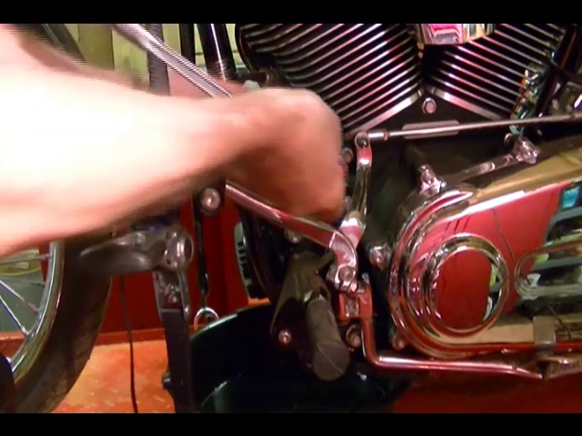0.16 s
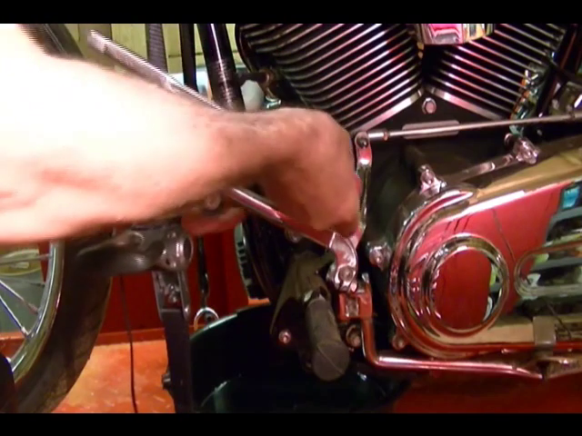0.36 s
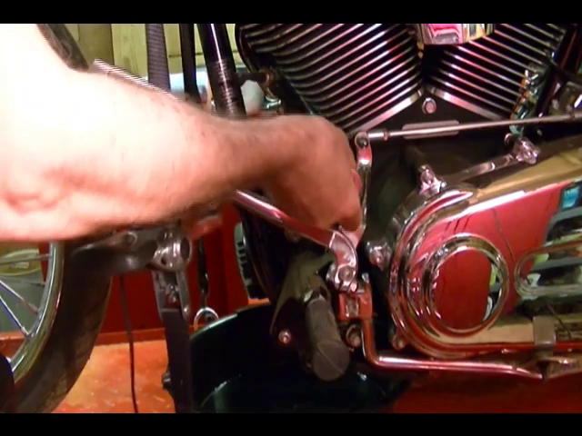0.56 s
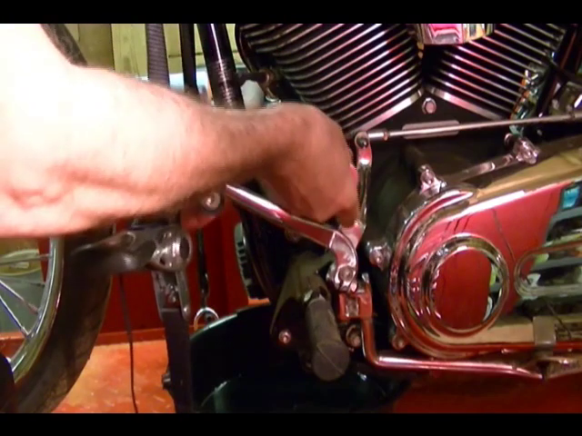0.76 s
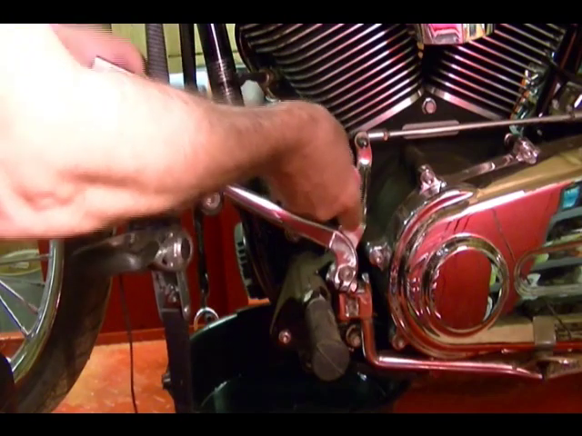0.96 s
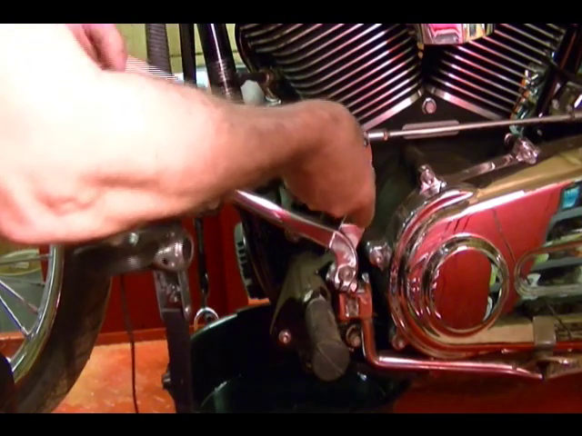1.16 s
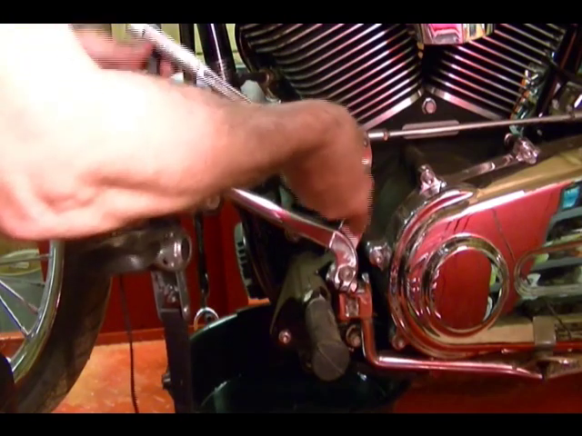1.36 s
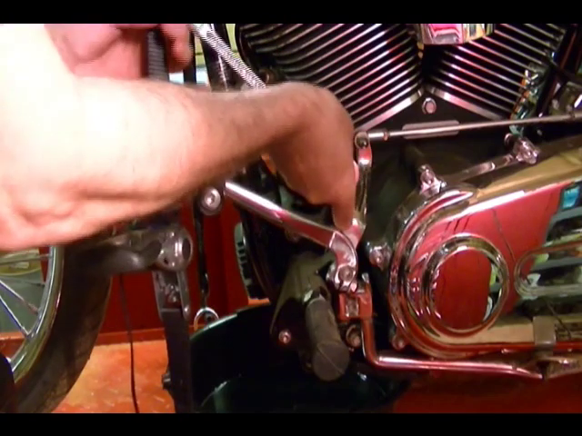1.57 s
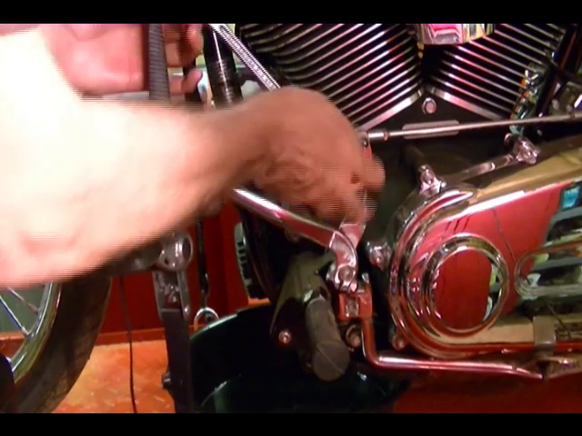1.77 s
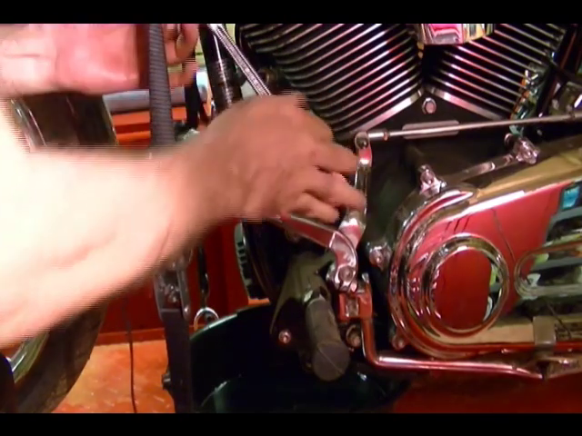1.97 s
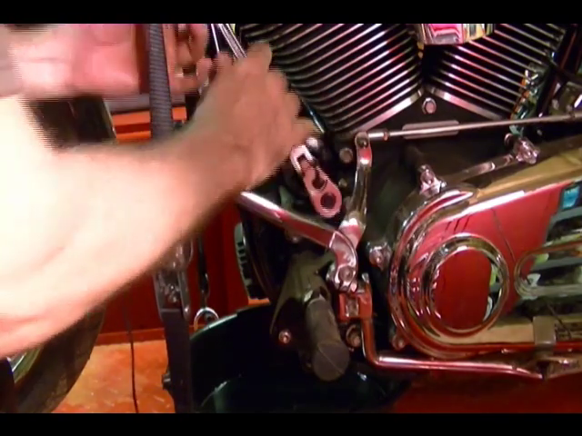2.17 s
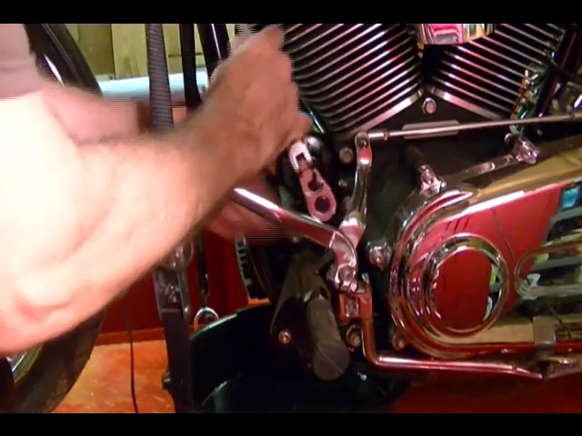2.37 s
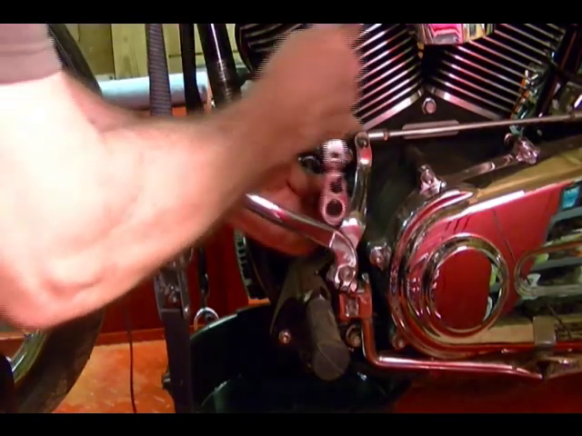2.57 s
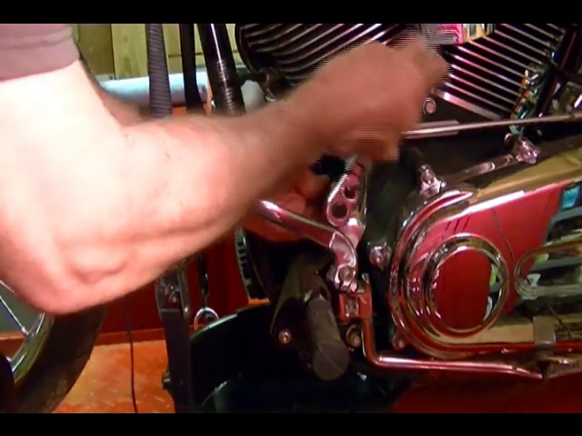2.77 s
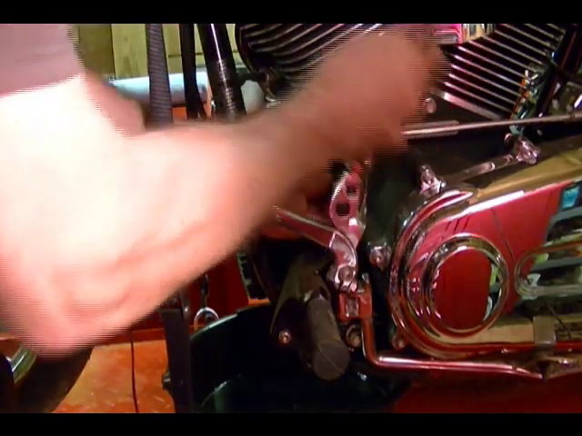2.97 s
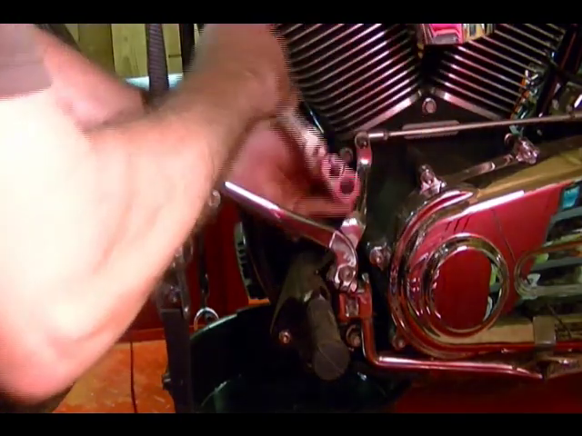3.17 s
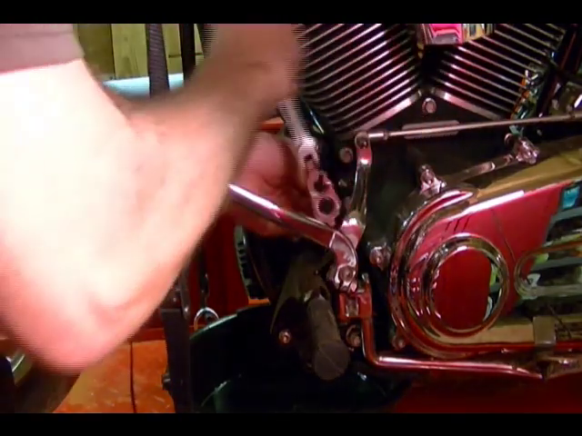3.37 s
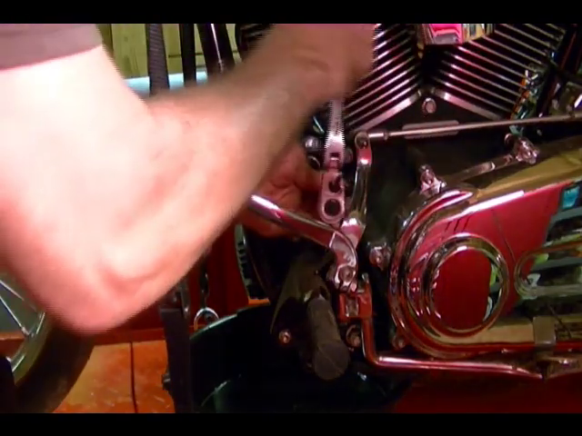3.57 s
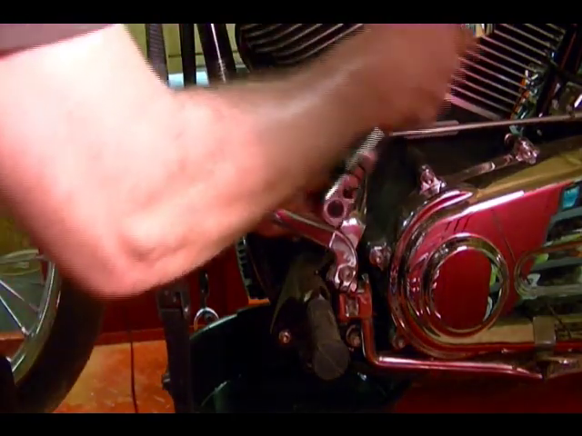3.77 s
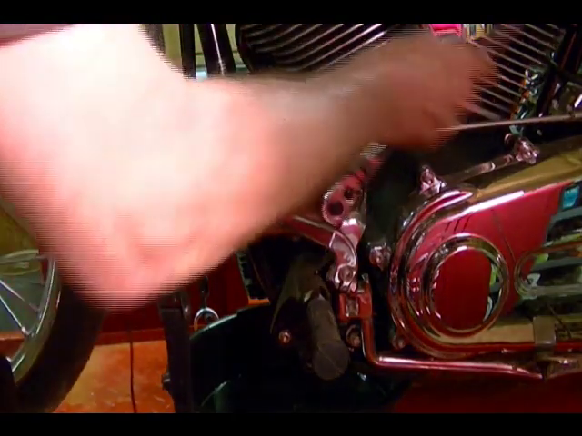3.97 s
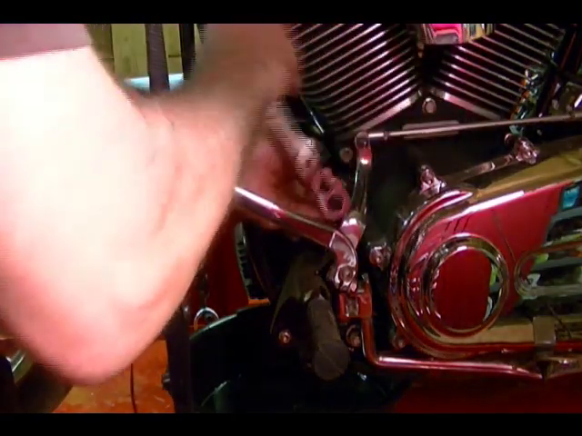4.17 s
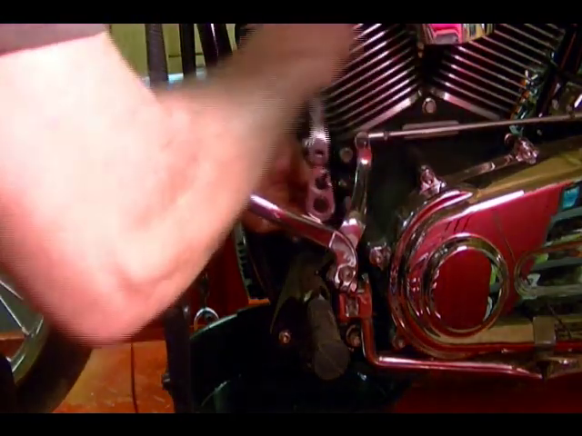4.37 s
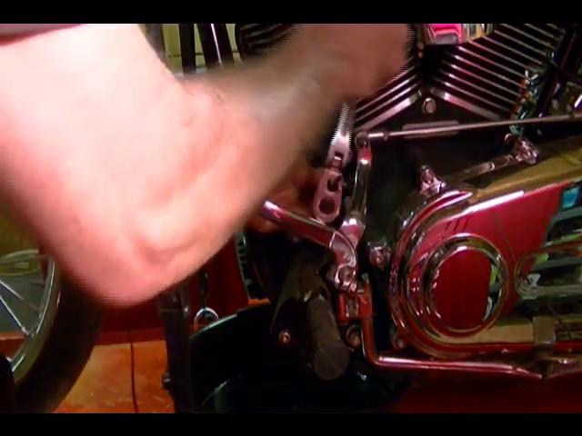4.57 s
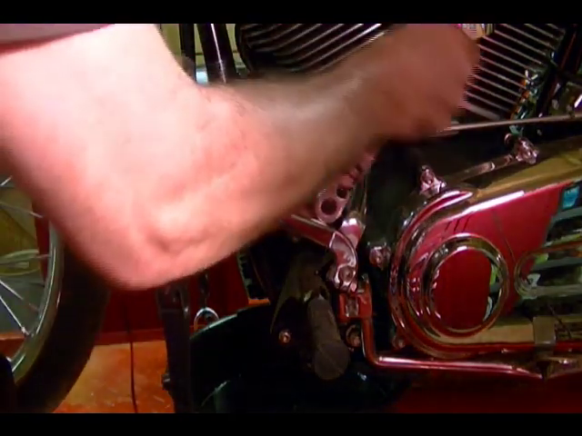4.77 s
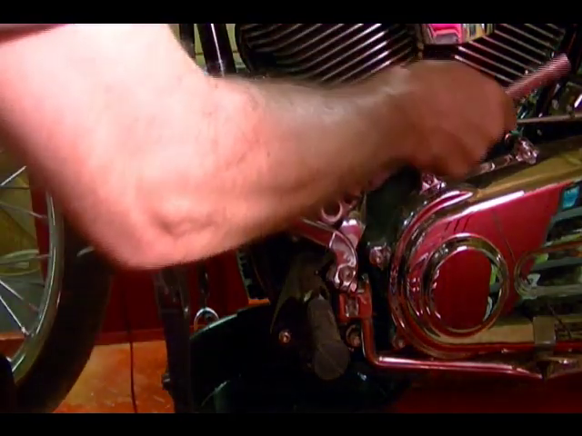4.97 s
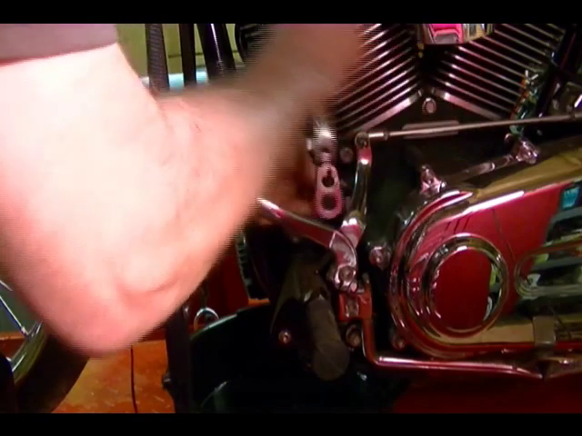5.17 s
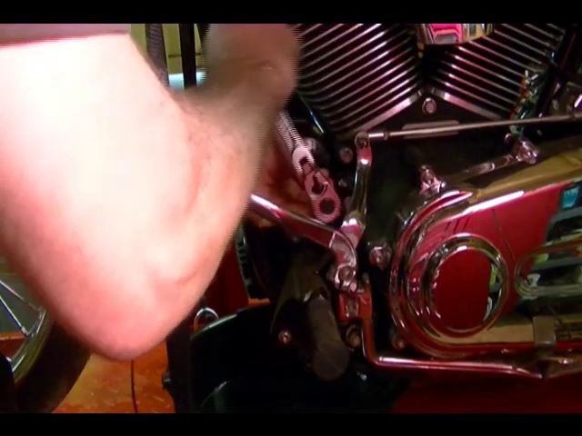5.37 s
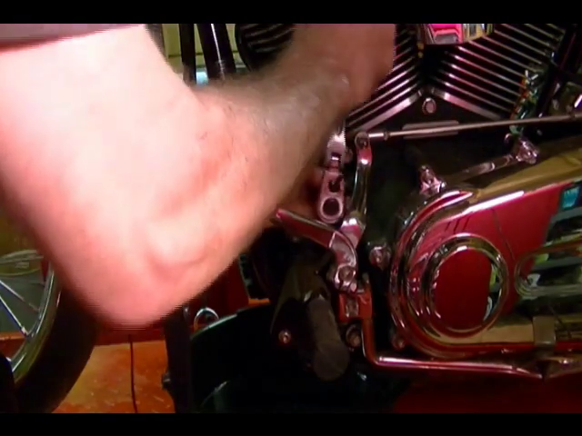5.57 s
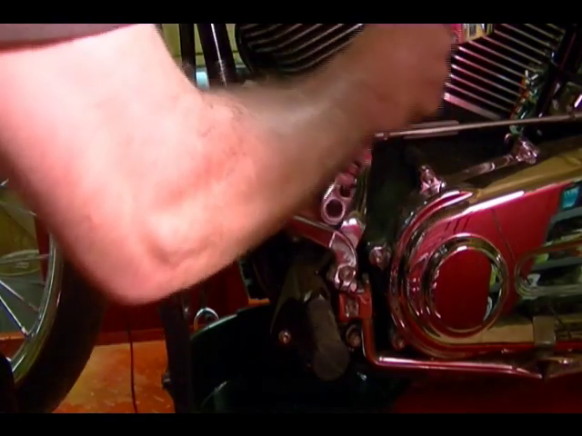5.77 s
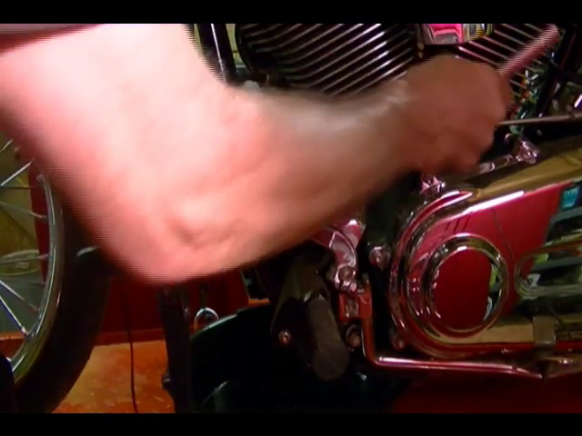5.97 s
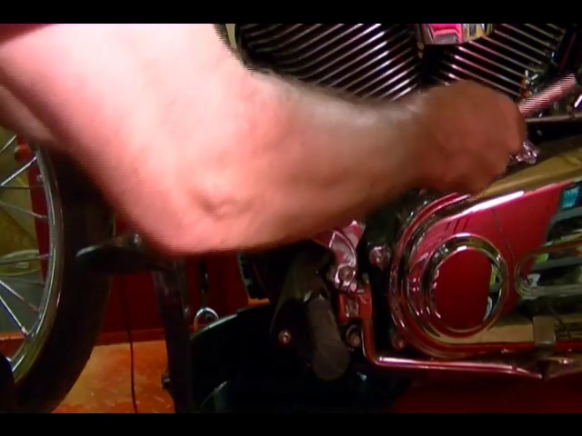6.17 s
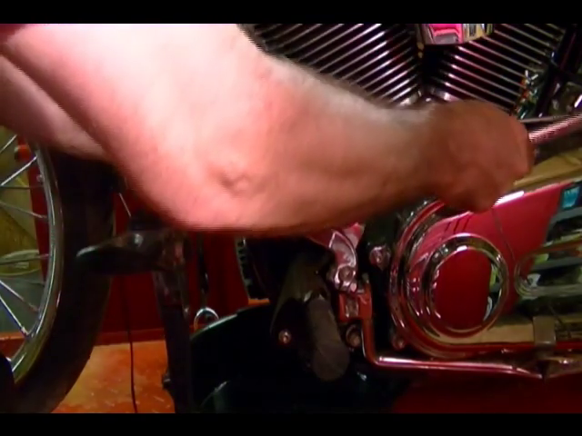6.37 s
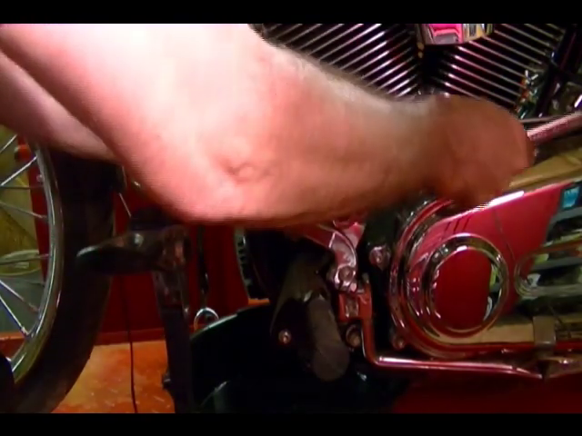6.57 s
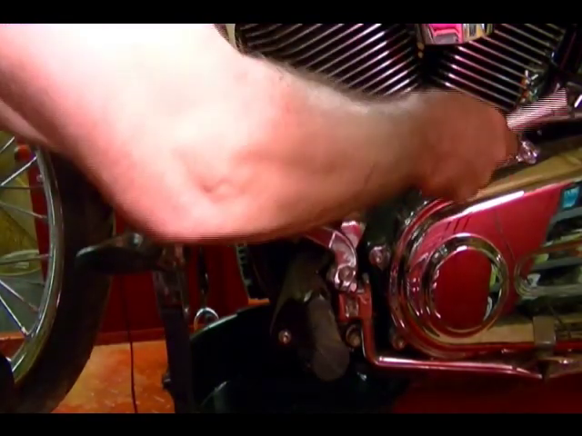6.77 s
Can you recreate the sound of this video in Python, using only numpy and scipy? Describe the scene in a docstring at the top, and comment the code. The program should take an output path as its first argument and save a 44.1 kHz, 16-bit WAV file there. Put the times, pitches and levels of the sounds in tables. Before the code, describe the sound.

Close microphone in a small garage with faint hiss and motor hum. A socket tool clanks hard on a motorcycle engine, its steel extension ringing brightly, then jangles and knocks dully into place. After soft hand rustling and a few light taps, a ratchet swings three times about a second apart: a quick run of four or five ticks, loose socket knocks, and a tight metallic snap. It ends nearly quiet.

```python
"""Steel clanks and rings over a faint hum and hiss, in a small garage: a socket ratchet is seated on a
filter of a motorcycle engine, then swung three times. On each back swing the pawl ticks over the teeth,
the loose socket knocks and the drive snaps tight. Blows are short bursts of coloured noise with decaying
sines, slides and pushes are shaped noise; the room adds scatter and a tail, and the recorder's gain control
ducks after the loudest blows."""
import sys
import numpy as np
from scipy import signal
from scipy.fft import rfft, irfft
from scipy.io import wavfile
from scipy.ndimage import uniform_filter1d, minimum_filter1d

SR = 44100
rng = np.random.default_rng(int(sys.argv[2]) if len(sys.argv) > 2 else 0)


def put_to_file(sound):
    """Save the sound as 16-bit audio at rate SR, in the file named by the first command-line argument."""
    columns = np.atleast_2d(sound).T  # one column per channel
    safe = np.clip(columns, -1, 1)
    whole_steps = np.round(safe * 32767)
    wavfile.write(sys.argv[1], SR, whole_steps.astype(np.int16))


N = 300188
T = np.arange(SR // 2) / SR  # time since a blow [s]

# All event levels are relative: each layer may add its own trim.
# tool striking the engine: (time [s], level [dB], main resonance [Hz], hard crack [dB],
# ping of the contact [Hz], ping level [dB], send to the room [dB])
ENGINE_CLANKS = [(0.083, -40, 1320, -27, 5800, 3, -12.5), (0.3906, -18, 1870, -2, 5940, -27, -9.5),
                 (0.41, -26.5, 1830, -4, 8600, 0, -18), (0.4171, -26.5, 1650, -5, 5900, -4, -8.5),
                 (0.4704, -9, 1970, -5, 4880, -41, -18), (0.8026, -19, 1192, -12.5, 4560, -14, -11),
                 (1.4, -23.5, 1170, 1, 9550, 1, -11), (2.2829, -19, 2500, -2, 4720, 8, -11),
                 (3.4731, -37.5, 1840, -16, 4660, 16, -11.5), (5.049, -36.5, 1530, -21, 5000, 7, -14),
                 (5.5037, -26.5, 1770, -16, 4500, 14, -7.5)]
CLANK_REF_DB = -20.5  # clank level at which the body and thud have their stated levels
# spectrum of a pawl tick or light tap: (frequency [Hz], level [dB])
TICK_SPECTRUM = [(50, -41), (300, -12), (900, -3.5), (1800, 7.5), (2800, 2), (3800, 2), (5000, 11.5),
                 (6300, 5.5), (7800, 6.5), (12500, 1.5), (16000, -16)]
# spectrum of hard steel cracking or rasping on steel: (frequency [Hz], level [dB])
CRACK_SPECTRUM = [(100, -50), (1500, -34.5), (3000, 4.5), (3900, -3), (4800, 15), (6500, 12.5),
                  (10000, 4.5), (13000, 3.5), (16000, -52)]


def amp(db):
    """Decibels to gain."""
    return 10 ** (np.asarray(db) / 20)


def evened(x):
    """Scales to rms 1."""
    return x / np.sqrt(np.mean(x ** 2) + 1e-20)


def unit_blow(x):
    """Scales to the energy of one millisecond at full level."""
    return x / np.sqrt(np.sum(x ** 2) * 1000 / SR + 1e-20)


def read(points, hz):
    """Joins (frequency [Hz], value) points on a log-frequency axis."""
    f, value = np.transpose(points)
    return np.interp(np.log(hz + 1), np.log(f), value)


def add(mix, s, sound):
    """Mixes a sound in at time s."""
    part = mix[max(round(s * SR), 0):][:len(sound)]
    part += sound[:len(part)]


def coloured(x, colour, size=2048):
    """Causal (minimum-phase) filter with the given spectrum, so attacks stay sharp."""
    hz = abs(np.fft.fftfreq(size, 1 / SR))
    log_gain = np.log(amp(read(colour, hz)))
    taps = np.fft.ifft(np.exp(np.conj(signal.hilbert(log_gain)))).real
    return signal.fftconvolve(x, taps)[:len(x)]


def chatter(colour, fade_s):
    """Steel chattering on steel: coloured noise that dies away exponentially."""
    burst = rng.standard_normal(len(T)) * np.exp(-T / fade_s)
    return unit_blow(coloured(burst, colour))


def ring(modes):
    """Decaying sines of a struck part."""
    return sum(amp(db - 60 * T / t60) * np.sin(2 * np.pi * hz * T) for hz, db, t60 in modes)


def rattled(modes, push):
    """Modes driven by a rough contact; each keeps its own share of the energy."""
    rings = [ring([mode]) for mode in modes]
    return sum(np.linalg.norm(r) * unit_blow(signal.fftconvolve(push, r)[:len(T)]) for r in rings)


def swell(length):
    """Rises to 1 at half the length [s], then fades."""
    u = 2 * T / length
    return u * np.exp(1 - u)


def pawl(level_db=1, lone_buzz_db=-14, buzz_slope=1.1, jolt_db=-13.5, jolt_delay_s=0.00196):
    """The pawl drops over teeth at evenly changing gaps; harder drops buzz more, each jolts the loose socket."""
    # back swings of the handle: (time [s], teeth passed [count], first gap [s], change of gap per tooth [s],
    # level [dB], growth per tooth [dB], buzz of the handle [dB])
    back_swings = [(3.047, 5, 0.0233, 0.0023, -33, 3, -7), (4.0894, 4, 0.021, -0.0002, -23, -1, -14),
                   (5.1443, 5, 0.0213, -0.0036, -24.5, -1.4, -8)]
    # the pawl slipping over one tooth as the hand turns or settles: (time [s], level [dB])
    lone_ticks = [(3.179, -25.5), (3.35, -39), (4.1623, -27), (4.314, -40.5), (5.129, -41), (6.7068, -40)]
    out = np.zeros(N)
    for start, teeth, gap, change, db, growth_db, buzz_db in back_swings:
        for k in range(round(teeth)):
            s = start + gap * k + change * k * (k - 1) / 2
            force_db = growth_db * k
            add(out, s, amp(db + force_db) * tooth(buzz_db + buzz_slope * force_db))
            add(out, s + jolt_delay_s, amp(db + jolt_db) * jiggle())
    for s, db in lone_ticks:
        add(out, s, amp(db) * tooth(lone_buzz_db))
    return amp(level_db) * out


def tooth(buzz_db, fade_s=0.005, handle_db=-10, buzz_hz=5020, buzz_s=0.0029):
    """One tooth: a bright tick, a short buzz near buzz_hz and a faint ring of the handle."""
    # handle resonances: (frequency [Hz], level [dB], t60 [s])
    handle_modes = [(5130, -17, 0.049), (4930, 2, 0.026)]
    pitch = buzz_hz * rng.uniform(0.95, 1.02)
    buzz = unit_blow(np.sin(2 * np.pi * pitch * T) * swell(buzz_s))
    handle = buzz + amp(handle_db) * unit_blow(ring(handle_modes))
    return unit_blow(chatter(TICK_SPECTRUM, fade_s) + amp(buzz_db) * handle)


def snaps(fade_s=0.0066, crack_db=-4, strike_db=-5, level_db=2):
    """The pawl locks with one hard strike and the ratchet head rings, damped by the hand."""
    # the drive taking up the load: (time [s], level [dB], noisy share of the strike [dB])
    lock_ups = [(3.2388, -10.5, -0.5), (4.2074, -11.5, -4.5), (5.3363, -13, -2.5)]
    # ratchet head resonances: (frequency [Hz], level [dB], t60 [s])
    head_modes = [(705, -19, .03), (1300, -18, .02), (3080, -9, .014), (3410, -5, .016), (3900, -7, .01),
                  (4480, 4, .023), (4620, -2, .012), (5400, -9, .01), (6500, -12, .012)]
    # spectrum of the locking contact: (frequency [Hz], level [dB])
    snap_spectrum = [(40, -52), (150, -6), (450, -19.5), (700, -0.5), (1800, -10.5), (3200, -5.5),
                     (5300, -2.5), (7000, -11), (12000, -11.5), (16000, -26)]
    out = np.zeros(N)
    for s, db, noisy_db in lock_ups:
        strike = chatter(snap_spectrum, .001)
        contact = amp(crack_db) * chatter(snap_spectrum, fade_s) + amp(strike_db) * strike
        snap = unit_blow(unit_blow(ring(head_modes)) + amp(noisy_db) * contact)
        add(out, s, amp(db + level_db) * snap)
    # the high-pass keeps the snap free of a low thump
    return signal.sosfilt(signal.butter(2, 420, "highpass", fs=SR, output="sos"), out)


def knocks(unevenness=0.18):
    """The socket knocks when the load changes, and jiggles unevenly while the grip shifts."""
    # loose socket knocking on the filter: (time [s], level [dB], main resonance [Hz])
    socket_knocks = [(0.371, -27.5, 1620), (0.423, -15, 1666), (0.432, -22, 1790), (0.612, -22, 2156),
                     (0.614, -19, 1190), (0.644, -21.5, 1180), (0.66, -21.5, 1190), (0.709, -29.5, 1170),
                     (0.783, -17.5, 1173), (1.382, -21.5, 1253), (1.391, -19, 1050), (3.18, -25, 1190),
                     (3.193, -18.5, 1885), (3.928, -36, 1085), (4.03, -28, 1096), (4.171, -21.5, 1240),
                     (4.174, -17, 1776), (4.389, -30, 1220), (5.104, -31.5, 1230), (5.121, -22, 1100),
                     (5.208, -23.5, 2010), (5.239, -30.5, 1710)]
    # faint jiggling of the socket: (start time [s], end time [s], usual gap between knocks [s], level [dB])
    grip_shifts = [(0.017, 0.15, 0.042, -39), (2.997, 3.045, 0.013, -39.5), (3.38, 3.41, 0.018, -39.5),
                   (5.436, 5.48, 0.014, -33.5)]
    out = np.zeros(N)
    for s, db, hz in socket_knocks:
        add(out, s, amp(db) * knock(hz))
    for start, end, gap, db in grip_shifts:
        for s in np.arange(start, end, gap):
            uneven_s = gap * unevenness * rng.uniform(-0.957, 1)
            add(out, s + uneven_s, amp(db) * jiggle())
    return out


def jiggle(centre_hz=1315, pitch_spread=0.21, spread_db=6):
    """A light knock of chance size and pitch (pitch spread as a share)."""
    size, pitch = rng.uniform(-1, 1, 2)
    return amp(spread_db * size) * knock(centre_hz * (1 + pitch_spread * pitch))


def knock(hz, fade_s=0.0079, press_s=0.0038, mode_db=3, sharpness=1.64):
    """A dull, oily contact: the socket's resonance swells and dies within a few cycles."""
    # spectrum of the oily contact: (frequency [Hz], level [dB])
    knock_spectrum = [(40, -67), (200, -22), (750, -14.5), (1100, 2.5), (1450, -9), (1850, 2), (2300, -6),
                      (3000, -18), (6000, -22.5), (14000, -51)]
    tone = unit_blow(np.sin(2 * np.pi * hz * T) * swell(press_s) ** sharpness)
    soft_onset = 1 - np.exp(-T / .001)
    rattle = unit_blow(chatter(knock_spectrum, fade_s) * soft_onset)
    return unit_blow(rattle + amp(mode_db) * tone)


def clanks(fade_s=0.0051, crack_s=0.01, body_s=0.0098, t60=0.041, mode_db=-4, level_db=3):
    """Hard blows on the engine, purer when harder; returns the direct sound and the part sent to the room."""
    # spectrum of the blow: (frequency [Hz], level [dB])
    clank_spectrum = [(60, -46), (400, -34), (800, -9.5), (1200, 3.5), (1500, -3.5), (2200, 1.5),
                      (3200, -8.5), (5000, -6.5), (14000, -42)]
    # spectrum of the low body under the blow: (frequency [Hz], level [dB])
    body_spectrum = [(30, -30), (150, -10), (400, -6.5), (750, 13), (1100, -15.5), (3000, -44),
                     (12000, -90)]
    body_db = -11.5  # body of a clank of the reference level
    ring_slope, body_slope = 0.16, 0.46  # more ring and less body in a harder blow [dB per dB]
    direct, sent = np.zeros(N), np.zeros(N)
    for s, db, hz, crack_db, ping_hz, ping_db, room_db in ENGINE_CLANKS:
        force_db = db - CLANK_REF_DB
        ping = unit_blow(ring([(ping_hz, 0, .01)]))
        tone = unit_blow(ring([(hz, 0, t60)]))
        blow = unit_blow(chatter(clank_spectrum, fade_s) + amp(mode_db + ring_slope * force_db) * tone)
        crack = unit_blow(chatter(CRACK_SPECTRUM, crack_s) + amp(ping_db) * ping)
        body = amp(body_db - body_slope * force_db) * chatter(body_spectrum, body_s)
        clank = blow + amp(crack_db) * crack + body
        add(direct, s, amp(db + level_db) * clank)
        add(sent, s, amp(db + level_db + room_db) * clank)
    return direct, sent


def ringing(drop_s=0.0063, rasp_db=-8, ping_db=-3, tap_db=-6, tap_s=0.005):
    """The extension rings on like a bar, loud, then fainter; the socket jangles, the hinge pings lightly."""
    # ringing of the extension: (time [s], level [dB], time until it drops [s])
    bar_rings = [(0.471, -10, 0.115), (0.576, -26, 0.46)]
    # socket jangling onto its square drive: (time [s], level [dB], decay of the rattle [s])
    socket_jangles = [(0.574, -4, 0.0067), (0.586, -11.5, 0.037)]
    # light taps of the handle's hinge: (time [s], level [dB])
    hinge_taps = [(2.7745, -23), (3.8277, -33.5)]
    # resonances of extension, socket and hinge: (frequency [Hz], level [dB], t60 [s])
    bar_modes = [(1475, -20.5, .9), (2853, -9, .34), (4990, 0, .27), (7553, -18, .5), (10461, -13, .28),
                 (10485, -21, .2), (13030, -33, .27)]
    socket_modes = [(1671, 4, .08), (2589, -17, .25), (3200, -7, .08), (3480, -6, .09), (5248, -2, .07),
                    (6094, -13, .1), (6896, -11, .13), (8900, -11, .08), (10440, -9, .15),
                    (10561, -10, .28), (15200, -27, .2)]
    hinge_modes = [(2260, -1, 0.059), (3620, 1.5, 0.025), (3801, -13.5, 0.15), (7320, -9, 0.079),
                   (7970, -14, .13), (13330, -25, 0.05)]
    out = np.zeros(N)
    for s, db, steady_s in bar_rings:
        drop = np.exp(-np.maximum(T - steady_s, 0) / drop_s)
        add(out, s, amp(db) * ring(bar_modes) * drop)
    for s, db, length in socket_jangles:
        rasp = chatter(CRACK_SPECTRUM, length)
        add(out, s, amp(db) * (unit_blow(rattled(socket_modes, rasp)) + amp(rasp_db) * rasp))
    for s, db in hinge_taps:
        tap = amp(tap_db) * chatter(TICK_SPECTRUM, tap_s)
        add(out, s, amp(db + ping_db) * (unit_blow(ring(hinge_modes)) + tap))
    return out


def bumps(thud_db=-56, thud_s=0.05, thud_ring_db=-6.5, thud_slope=0.25):
    """The frame thumps low, and every clank nudges it too, more when harder (slope in dB per dB)."""
    # low thumps of the frame, from pushes, turns and a clank: (time [s], level [dB], length [s],
    # hollow ring of the frame [dB])
    frame_thumps = [(1.811, -48, 0.028, 2), (3.207, -37.5, 0.012, 0), (4.193, -44.5, 0.013, -10),
                    (5.519, -56, 0.062, -2)]
    out = np.zeros(N)
    for s, db, length, ring_db in frame_thumps:
        add(out, s, amp(db) * frame(swell(length), ring_db))
    for s, db, *_ in ENGINE_CLANKS:
        nudge_db = thud_db + thud_slope * (db - CLANK_REF_DB)
        add(out, s, amp(nudge_db) * frame(swell(thud_s), thud_ring_db))
    return out


def scrapes():
    """Hand and steel slide briefly on the engine: friction noise that swells and fades."""
    # slides: (time [s], level [dB], length [s], brightness [dB per octave])
    slides = [(0.399, -34, 0.034, 11), (0.579, -36.5, 0.077, 2), (1.072, -37, 0.011, -2.5),
              (1.398, -31, 0.0041, 23), (1.758, -44, 0.024, -3), (2.421, -51, 0.014, -7.5),
              (2.858, -55, 0.076, -6.5), (5.015, -50, 0.018, -6.5), (5.428, -44.5, 0.028, -4.5),
              (6.692, -49.5, 0.021, -7)]
    out = np.zeros(N)
    for s, db, length, tilt_db in slides:
        add(out, s, amp(db) * friction(tilt_db, len(T)) * swell(length))
    return out


def fumble(rumble_db=-1, ring_db=-2, rustle_db=2, tilt_db=-2):
    """The hand works behind the engine: the arm leans on the frame while the skin rustles over metal."""
    # the hand feeling for the filter: (time [s], low rumble [dB], rustle [dB])
    hand_moves = [(0.87, -63, -51), (0.9, -48.5, -48.5), (0.988, -50, -56.5), (1.09, -63, -51.5),
                  (1.112, -54, -63), (1.232, -57, -52.5), (1.24, -69, -71), (1.306, -53.5, -63),
                  (1.37, -59, -66)]
    out = np.zeros(N)
    s, low_db, high_db = np.transpose(hand_moves)
    lean = np.interp(s[0] + T, s, amp(low_db), right=0)
    slide = np.interp(s[0] + T, s, amp(high_db), right=0)
    rumble = amp(rumble_db) * frame(lean, ring_db)
    rustle = amp(rustle_db) * friction(tilt_db, len(T)) * slide
    add(out, s[0], rumble + rustle)
    return out


def friction(tilt_db, size, grain_db=4, slips_per_s=2500):
    """Many tiny slips of uneven size; steel on steel is bright, skin is dull."""
    # spectrum of sliding before the tilt: (frequency [Hz], level [dB])
    scrape_spectrum = [(200, -36), (650, 7.5), (1100, 0.5), (1900, 10.5), (3000, 3.5), (5500, 8.5),
                       (8000, 4.5), (12000, -5), (16000, -31)]
    slips = rng.standard_normal(size) * (rng.random(size) < slips_per_s / SR)
    slips = slips * amp(grain_db * np.minimum(rng.exponential(1, size), 3))
    tilted = [(hz, level + tilt_db * np.log2(hz)) for hz, level in scrape_spectrum]
    return evened(coloured(slips, tilted))


def frame(pressure, ring_db):
    """A soft push rumbles in the frame and wakes its hollow ring."""
    # spectrum of the push: (frequency [Hz], level [dB])
    push_spectrum = [(40, -39), (100, -10), (170, -8.5), (280, -6.5), (420, -2.5), (650, -8), (1100, -41),
                     (4000, -37)]
    # hollow frame resonances: (frequency [Hz], level [dB], t60 [s])
    frame_modes = [(248, 2, 0.3), (167, -17, 0.13)]
    push = evened(coloured(rng.standard_normal(len(T)), push_spectrum)) * pressure
    return push + amp(ring_db) * evened(rattled(frame_modes, push)) * push.std()


def garage(x, near_db=-2, near_s=0.015, rise_s=0.00053):
    """Quick scatter off the engine and floor, then the room's tail, its decay set by frequency."""
    # decay of the room: (frequency [Hz], t60 [s])
    room_decay = [(150, 0.46), (600, 0.64), (2000, 0.56), (4500, 0.45), (8000, 0.49), (15000, 0.15)]
    # spectrum the room returns: (frequency [Hz], level [dB])
    room_spectrum = [(100, -8), (450, 7), (800, 5.5), (1200, 3), (1800, 1.5), (3000, 1.5), (6000, -1),
                     (10000, 0), (16000, 6.5)]
    hz, t, noise = signal.stft(rng.standard_normal(SR), SR, nperseg=256)
    decay = amp(-60 * t / read(room_decay, hz)[:, None])
    tail = signal.istft(noise * decay, SR, nperseg=256)[1][:len(T)]
    sparse = rng.random(len(T)) < .1
    near = rng.standard_normal(len(T)) * sparse * np.exp(-T / near_s)
    echo = tail / np.linalg.norm(tail) + amp(near_db) * near / np.linalg.norm(near)
    echo = echo * (1 - np.exp(-T / rise_s))
    return signal.fftconvolve(x, coloured(echo, room_spectrum))[:N]


def background(waver=0.4, air_db=-57):
    """Steady hiss, and the hum of a distant motor as sines whose phases wander (step in rad)."""
    # spectrum of the hiss: (frequency [Hz], relative level [dB per Hz])
    air_spectrum = [(15, -46), (25, -33), (76, -1.5), (212, -0.5), (242, 0.5), (270, -1.5), (439, -3.5),
                    (476, -7.5), (560, -4), (818, -7), (1260, -10), (1520, -11), (1940, -13), (5140, -15),
                    (16000, -27.5)]
    # tones of the hum: (frequency [Hz], level [dB])
    hum_tones = [(83, -83.5), (120, -79), (479, -70), (839.8, -72.5), (1082, -72.5), (1200, -74.5),
                 (1561, -75), (1680, -76)]
    air_gain = amp(read(air_spectrum, np.fft.rfftfreq(N, 1 / SR)))
    air = evened(irfft(rfft(rng.standard_normal(N)) * air_gain, N))
    t, knots = np.arange(N) / SR, np.linspace(0, N / SR, num=60)
    hum = 0
    for hz, db in hum_tones:
        drift = np.interp(t, knots, np.cumsum(rng.standard_normal(len(knots))))
        hum = hum + amp(db) * evened(np.sin(2 * np.pi * hz * t + waver * drift))
    return amp(air_db) * air + hum


def scene(pawl_room_db=-11, snap_room_db=-15, knock_room_db=-13, ring_room_db=-16, rub_room_db=-9):
    """All tool sounds, each feeding the room by its own amount, over the background."""
    clank, clank_sent = clanks()
    parts = [
        (pawl(), pawl_room_db),
        (snaps(), snap_room_db),
        (knocks(), knock_room_db),
        (ringing(), ring_room_db),
        (bumps() + scrapes() + fumble(), rub_room_db),
    ]
    direct = clank + sum(x for x, db in parts)
    sent = clank_sent + sum(amp(db) * x for x, db in parts)
    return (direct + garage(sent) + background())[None]


def record(dry, limit_db=-22, recover_db_per_s=8, sense_s=0.012, edge_hz=16300):
    """Gain control ducks after the loudest blows, a quick limiter holds the peaks, then the band limit."""
    keep = np.exp(-1 / (sense_s * SR))
    power = signal.lfilter([1 - keep], [1, -keep], dry[0] ** 2)
    power_db = 10 * np.log10(power + 1e-12)
    # hold the highest power, letting it fall at the recovery rate
    fall = np.arange(N) * recover_db_per_s / SR
    held_db = np.maximum.accumulate(power_db + fall) - fall
    over_db = np.maximum(held_db - limit_db, 0)
    ducked = dry / amp(over_db)
    headroom = .5 / np.maximum(abs(ducked[0]), .5)
    limited = ducked * uniform_filter1d(minimum_filter1d(headroom, size=31), size=31)
    band = signal.firwin(511, edge_hz, window=("kaiser", 9), fs=SR)
    return signal.oaconvolve(limited, band[None], "same")


dry = scene()
out = record(dry)
put_to_file(out)
```